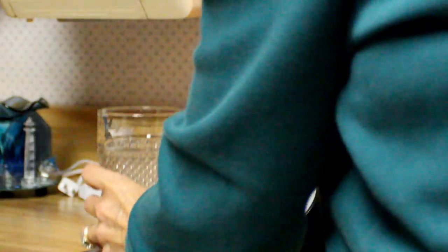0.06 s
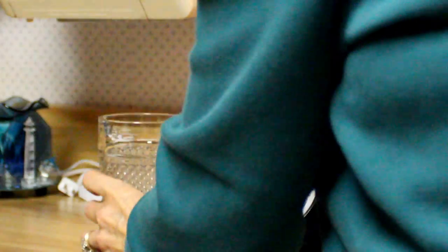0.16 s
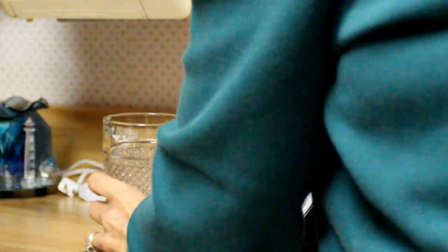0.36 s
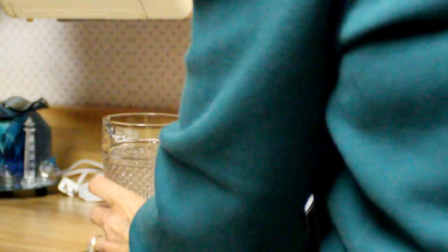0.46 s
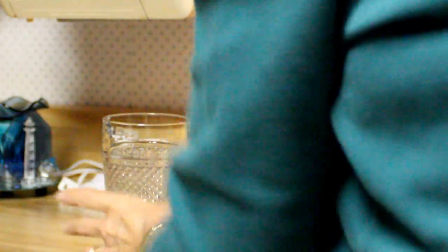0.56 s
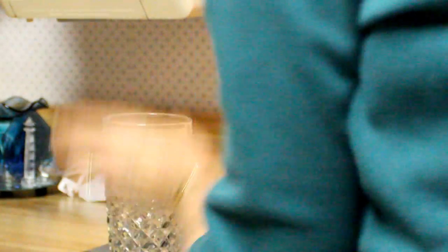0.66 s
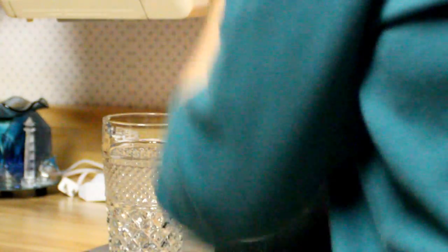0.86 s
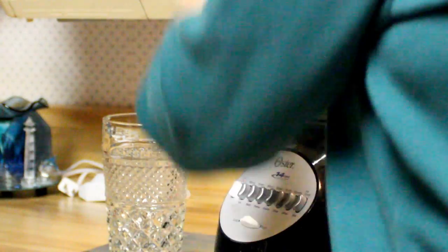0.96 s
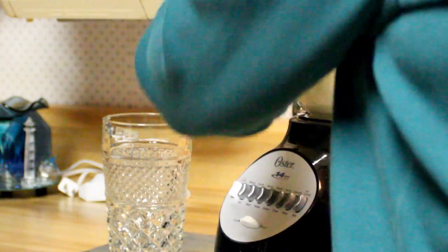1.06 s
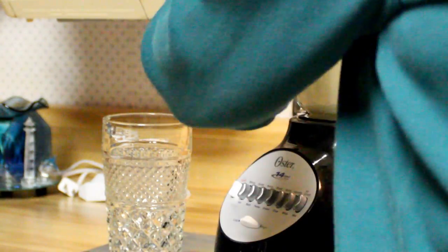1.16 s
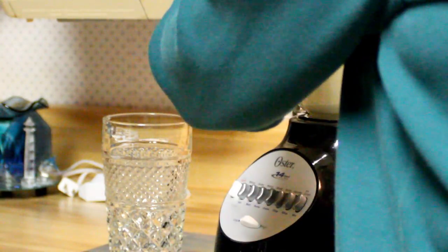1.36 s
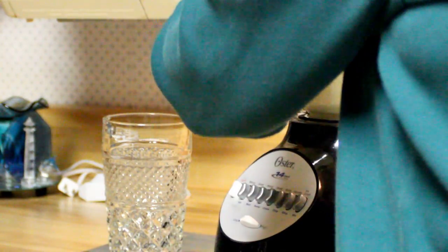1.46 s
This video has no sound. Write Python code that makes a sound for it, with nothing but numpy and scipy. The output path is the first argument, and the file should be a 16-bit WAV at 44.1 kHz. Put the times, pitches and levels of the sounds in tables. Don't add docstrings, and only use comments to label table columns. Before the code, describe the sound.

A heavy glass tumbler lands on a wooden counter with a sharp, chattering knock and short ring, then a brief rub as it settles; close microphone in a hard-walled kitchen, faint hiss and hum.

```python
import sys
import numpy as np
from scipy import signal
from scipy.io import wavfile

SR = 44100
rng = np.random.default_rng(int(sys.argv[2]) if len(sys.argv) > 2 else 0)


def transcribe(signal):
    frames = np.atleast_2d(signal).T
    limited = np.clip(frames, -1, 1)
    pcm = np.round(limited * 32767).astype(np.int16)
    wavfile.write(sys.argv[1], SR, pcm)


def field_ratio(decibels):
    return 10 ** (np.asarray(decibels, dtype=float) / 20)


N = 66150

# [t/s, strength/dB, hardness f/Hz]
BASE_CONTACTS = [
    (.2330, -8.5, 2500),
    (.2352, -1, 2670),
    (0.2374, -7, 2500),
    (.2396, -3.5, 3240),
    (.2414, -6, 3160),
    (0.2447, -5.5, 2500),
    (.2488, -7.5, 2500),
    (0.2521, -8, 2500),
    (0.2577, -17, 2500),
    (0.2863, -15.5, 1800),
]
# [t/s, level/dB]
SETTLING_PRESSURE = [
    (.25, -49.5),
    (.27, -33),
    (.32, -35.5),
    (.40, -41.5),
    (.42, -43.5),
    (.445, -37),
    (.465, -42.5),
    (.53, -54),
    (.62, -67),
]
# [f/Hz, level/dB, t60/s]
COUNTER_MODES = [(155, -19, 0.094), (266.3, -19, 0.15), (327, -20, 0.098), (394, -21, 0.056),
                 (526, -10.5, 0.033), (687, -13, .04), (812, -6.5, 0.048), (1050.4, -4.5, .06),
                 (1150, -17.5, 0.033), (1270, -19, .05), (1361, -6, 0.023), (1418, -7, .04),
                 (1532, 2.2, 0.025), (1800, -9, 0.029)]
# [f/Hz, level/dB, t60/s]
GLASS_MODES = [(2035, -6, .07), (2199, -15, 0.1), (2350, -10.5, 0.091), (2640, -12, 0.054),
               (2932, -6.5, 0.037), (3380, -16, 0.066), (3700, -6, 0.023), (4050, -17, .04),
               (4600, -12.5, 0.12), (5207, -18.5, 0.071), (5814, -20, 0.16), (6460, -26, .08),
               (7860, -29.5, 0.17), (8400, -47, 0.18)]
# [f/Hz, level/dB, t60/s]
KITCHEN_TAIL = [(60, -31, .8), (200, -11, 1), (463, -6, 0.71), (1520, -15.5, 0.51), (4000, -14.5, 0.62),
                (8000, -21, 0.088), (14000, -18, .15)]
# [t/s, lift/dB]
SLEEVE_LIFT = [
    (.05, 0.3),
    (.12, 1.7),
    (.2, .1),
    (.85, 0.3),
    (.95, 2.2),
    (1.08, 0.4),
]
# [f/Hz, level/dB per Hz]
HISS_SPECTRUM = [(25, -10), (60, -10), (100, -8.5), (200, -3.5), (450, -7), (900, -8.5), (4000, -14),
                 (14000, -22)]
# [f/Hz, level/dB; each line's peak sits 5 dB above it]
HUM_LINES = [(120, -69.5), (241, -83), (360, -76.5), (452, -74), (1080, -84)]
BAND_EDGES = 20 * 2 ** np.arange(0, 10, .5)

STRIKE_SPREAD_DB = 2.5
GRAINS_PER_S, GRAIN_SPREAD_DB, GRAIN_HZ = 2200, 3.5, 1510
CRACK_DB, CRACK_T60_S, CRACK_HZ, CRACK_RISE_HZ = -41, 0.069, 5000, 200
BODY_DB, BODY_T60_S, BODY_LOW_HZ, BODY_HIGH_HZ = -11.5, 0.028, 493, 3900
RUB_DB, RUB_LOW_HZ, RUB_HIGH_HZ, RUB_TOP_HZ = -14, 250, 520, 4380
THUD_DB, THUD_T60_S, THUD_LOW_HZ, THUD_HIGH_HZ = -21.5, 1.16, 36.2, 71.7
FIRST_ECHO_S, BUILD_S = 0.002, 0.006
MIC_LOW_HZ, MIC_TOP_HZ, MIC_CEILING = 160, 15100, 1.25
HISS_DB, HISS_PATCHY_DB, SLEEVE_HZ = -55.5, -0.24, 2990
HUM_WANDER_DB = 1.2


def tumbler():
    t = np.arange(N) / SR
    pushes = np.array([soften(field_ratio(db) * (np.arange(N) == int(s * SR)), hz) for s, db, hz in BASE_CONTACTS])
    blows = pushes.sum(axis=0)
    pressure = field_ratio(np.interp(t, *np.transpose(SETTLING_PRESSURE), left=-200, right=-200))
    ringing = 0
    for k, (hz, db, t60) in enumerate(COUNTER_MODES + GLASS_MODES):
        grains = settling_grains(pressure)
        strengths = field_ratio(STRIKE_SPREAD_DB * rng.standard_normal(len(pushes)))
        sign = (-1) ** k
        ringing = ringing + sign * field_ratio(db - 4.5) * ring(strengths @ pushes + grains, hz, t60)
    rub = np.abs(grains)
    return ringing + crack(blows) + body(blows, rub) + thud(blows)


def settling_grains(pressure):
    slips = (rng.random(N) < GRAINS_PER_S / SR) * rng.choice([-1, 1], N)
    sizes = field_ratio(GRAIN_SPREAD_DB * np.minimum(rng.exponential(1, N), 4))
    return soften(pressure * (slips * sizes), GRAIN_HZ)


def crack(blows):
    return field_ratio(CRACK_DB) * burst(soften(blows, CRACK_RISE_HZ), CRACK_T60_S, "high", CRACK_HZ)


def body(blows, rub):
    wood = burst(blows + rub, BODY_T60_S, "band", [BODY_LOW_HZ, BODY_HIGH_HZ])
    rumble = burst(rub, BODY_T60_S, "band", [RUB_LOW_HZ, RUB_HIGH_HZ])
    return field_ratio(BODY_DB) * soften(wood, RUB_TOP_HZ) + field_ratio(RUB_DB) * rumble


def thud(blows):
    return field_ratio(THUD_DB) * burst(blows, THUD_T60_S, "band", [THUD_LOW_HZ, THUD_HIGH_HZ])


def ring(force, hz, t60):
    r, w = field_ratio(-60 / (t60 * SR)), 2 * np.pi * hz / SR
    return signal.lfilter([.5, 0, -.5], [1, -2 * r * np.cos(w), r * r], force + 1e-18)


def soften(x, hz):
    r = np.exp(-4 * np.pi * hz / SR)
    return signal.sosfilt([[(1 - r) ** 2, 0, 0, 1, -2 * r, r * r]] * 2, x)


def burst(force, t60, kind, hz):
    dying = signal.lfilter([1], [1, -field_ratio(-60 / (t60 * SR))], force)
    return signal.sosfilt(signal.butter(2, hz, kind, fs=SR, output="sos"), dying * rng.standard_normal(N))


def kitchen(x):
    t = np.maximum(np.arange(N) / SR - FIRST_ECHO_S, 0)
    tail = 0
    for hz, band in bands():
        t60 = at_hz(KITCHEN_TAIL, hz, column=2)
        tail = tail + band * field_ratio(at_hz(KITCHEN_TAIL, hz) - 60 * t / t60)
    build_up = 1 - np.exp(-t / BUILD_S)
    return signal.fftconvolve(x, tail * build_up * field_ratio(-28.5))[:N]


def bands():
    white = rng.standard_normal((2, N + SR // 2))
    out = []
    for k, (low, high) in enumerate(zip(BAND_EDGES, BAND_EDGES[1:])):
        sos = signal.butter(2, [low, high], "band", fs=SR, output="sos")
        out.append((np.sqrt(low * high), signal.sosfilt(sos, white[k % 2])[-N:]))
    return out


def at_hz(points, hz, column=1):
    return np.interp(np.log(hz), np.log(np.array(points)[:, 0]), np.array(points)[:, column])


def background():
    return mic_hiss() + mains_hum()


def mic_hiss():
    together = drift(2.8)
    sleeve_db = np.interp(np.arange(N) / SR, *np.transpose(SLEEVE_LIFT))
    hiss = 0
    for hz, band in bands():
        patchy_db = HISS_PATCHY_DB * (together + drift(10))
        lift_db = sleeve_db / (1 + (hz / SLEEVE_HZ) ** 2)
        hiss = hiss + band * field_ratio(at_hz(HISS_SPECTRUM, hz) + patchy_db + lift_db)
    hiss = signal.sosfilt(signal.cheby2(20, 40, MIC_TOP_HZ, fs=SR, output="sos"), hiss)
    return field_ratio(HISS_DB) * rms_one(hiss)


def mains_hum():
    hum = 0
    for hz, db in HUM_LINES:
        level = field_ratio(db + 5 + HUM_WANDER_DB * drift(3.1))
        hum = hum + level * np.sin(2 * np.pi * (hz * np.arange(N) / SR + rng.random()))
    return hum


def drift(rate):
    r = np.exp(-80 * np.pi * rate / SR)
    slow = signal.lfilter([1], [1, -2 * r, r * r], rng.standard_normal(N // 40 + 2002))[2000:]
    return np.interp(np.arange(N) / 40, np.arange(len(slow)), rms_one(slow))


def rms_one(x):
    return x / np.sqrt(np.mean(x ** 2) + 1e-20)


def scene():
    knock = tumbler()
    heard = signal.lfilter(*signal.butter(1, MIC_LOW_HZ, "high", fs=SR), knock + kitchen(knock))
    return (heard + background())[None]


def top_cut(x):
    return signal.sosfilt(signal.butter(12, 15610, fs=SR, output="sos"), x)


def record(dry):
    mix = MIC_CEILING * np.tanh(dry / MIC_CEILING)
    return top_cut(mix)


dry = scene()
out = record(dry)
transcribe(out)
```